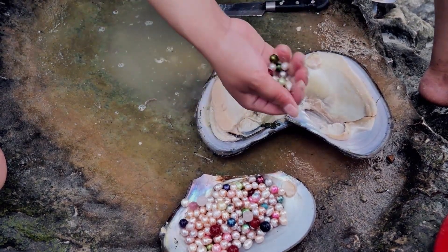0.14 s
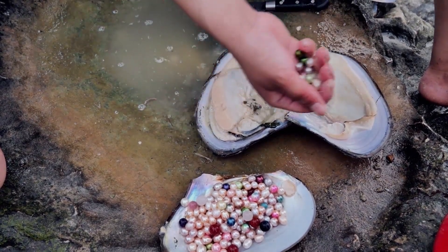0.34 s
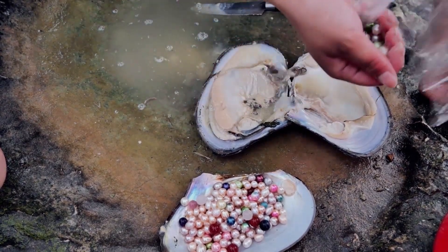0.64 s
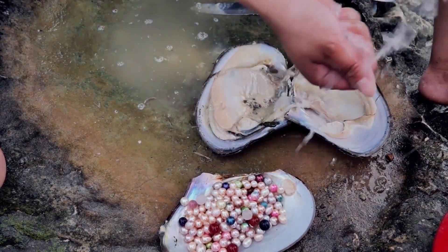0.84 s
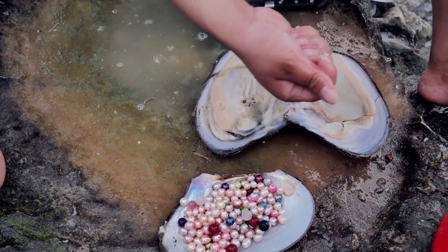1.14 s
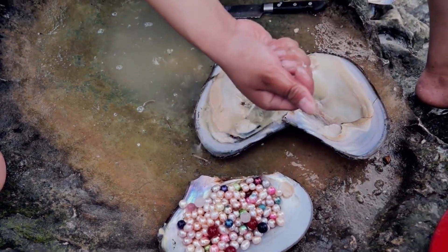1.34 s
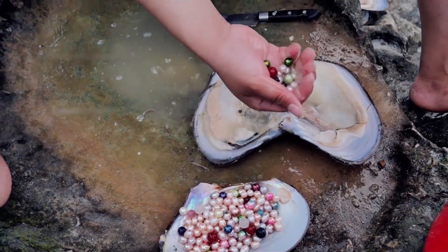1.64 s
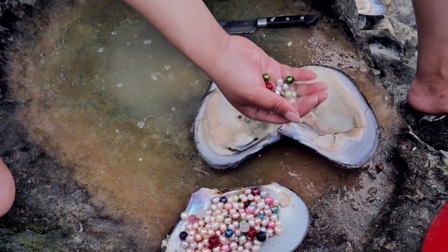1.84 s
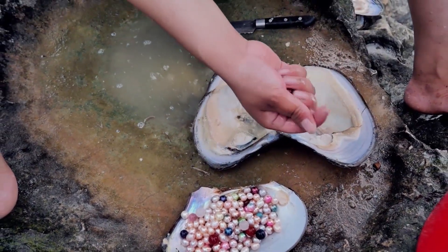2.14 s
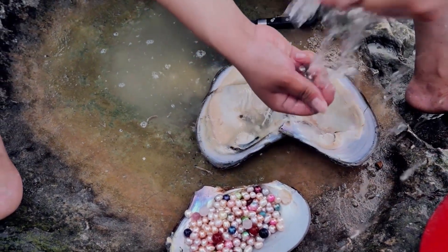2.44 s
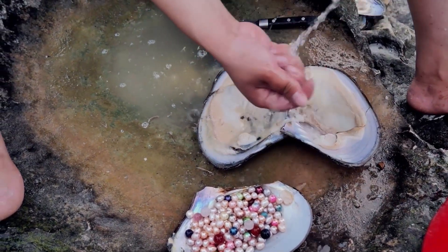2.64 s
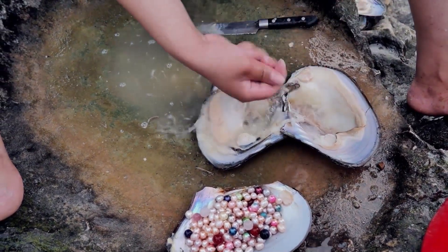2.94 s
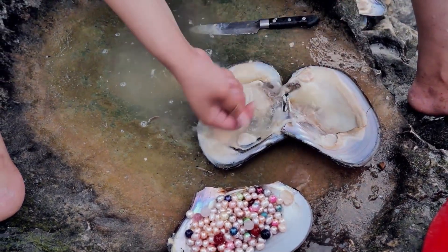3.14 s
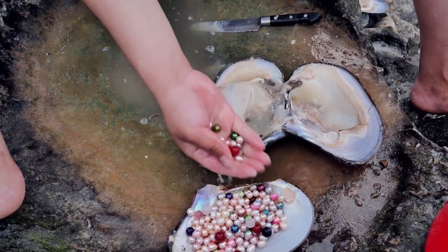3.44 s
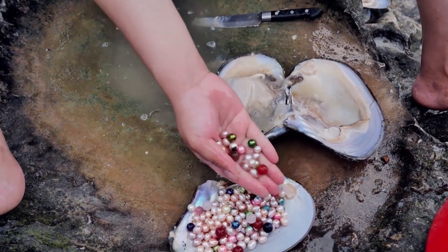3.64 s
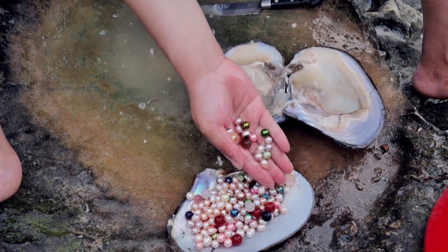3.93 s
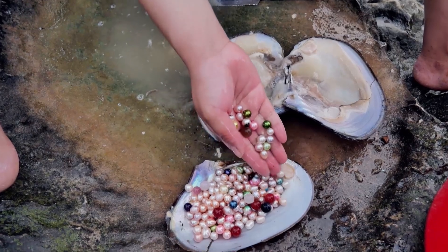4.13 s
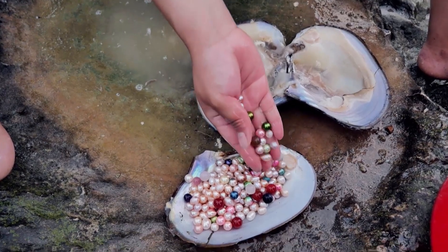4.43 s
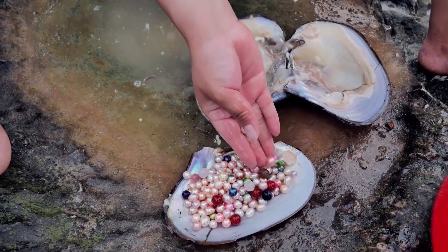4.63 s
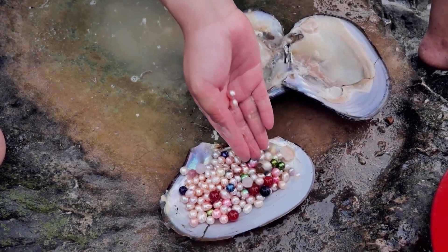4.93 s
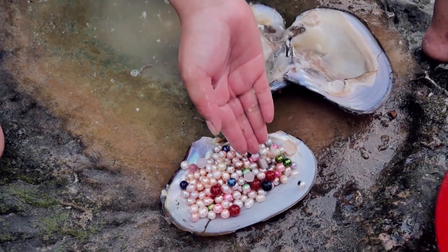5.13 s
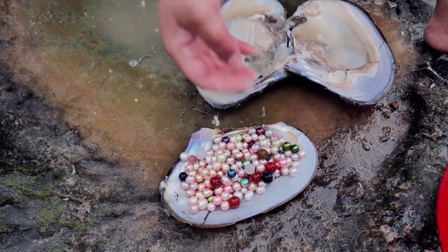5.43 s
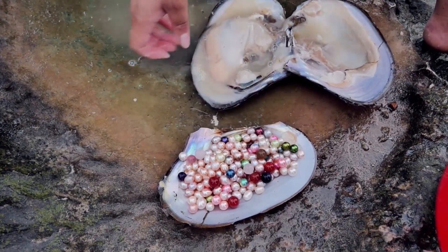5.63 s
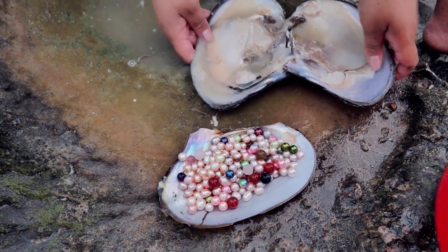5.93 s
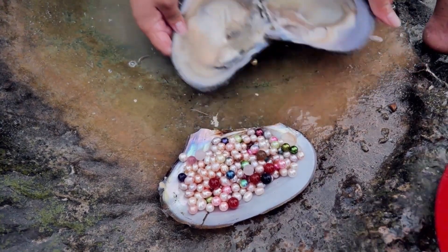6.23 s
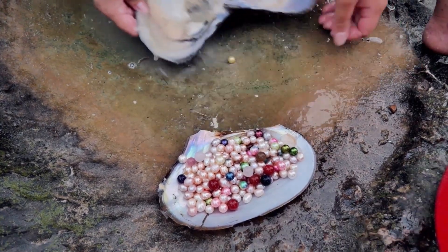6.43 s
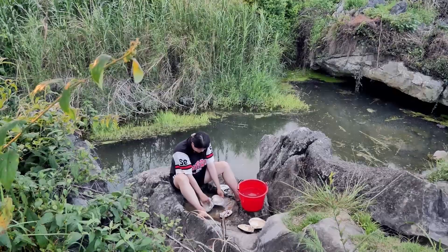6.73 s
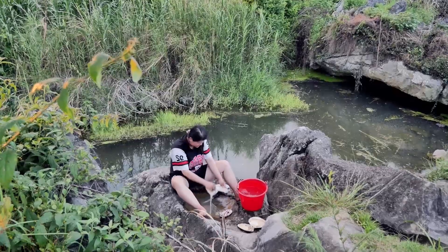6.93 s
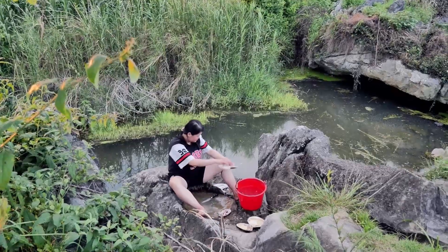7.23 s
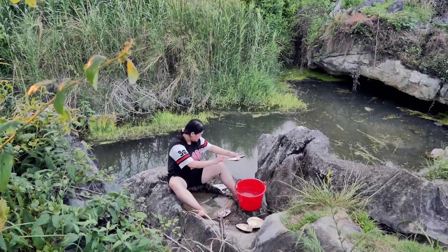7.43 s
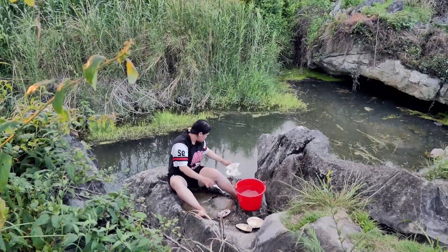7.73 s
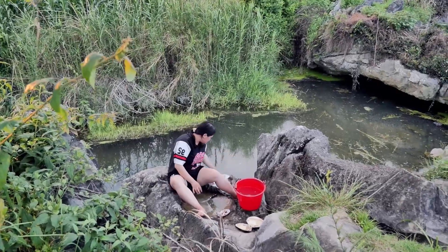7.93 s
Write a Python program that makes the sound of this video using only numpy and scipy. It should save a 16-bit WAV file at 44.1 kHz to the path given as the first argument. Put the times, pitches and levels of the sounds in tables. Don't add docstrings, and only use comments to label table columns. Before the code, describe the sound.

Close outdoors at a rock pool, a hand rinses beads in quick bursts of bubbling splashes, drips and fine spray, busiest in the first second and again after two. The water stops, a bird whistles faintly, and beads drop then pour with hard glassy ticks onto a heap in a shell. A big shell rubs and knocks on rock. After a short silence, a wider quiet ambience has low hum, a pulsing insect and tiny wet ticks.

```python
import sys
import numpy as np
from scipy import signal
from scipy.fft import rfft, irfft
from scipy.io import wavfile
from scipy.ndimage import uniform_filter1d

SR = 44100
rng = np.random.default_rng(int(sys.argv[2]) if len(sys.argv) > 2 else 0)


def boost(x):
    u = np.asarray(x, float) / 20
    return 10 ** u


def master(y):
    cut = np.clip(np.atleast_2d(y).T, -1, 1)
    pcm = np.round(cut * 32767)
    wavfile.write(sys.argv[1], SR, pcm.astype(np.int16))


N = 355887


def evened(x):
    return x / np.sqrt(np.mean(x ** 2) + 1e-20)


def read(points, hz):
    f, value = np.transpose(points)
    return np.interp(np.log(hz + 1), np.log(f + 1), value)


def curve(rows, col):
    rows = np.asarray(rows)
    return boost(np.interp(np.arange(N) / SR, rows[:, 0], rows[:, col]))


def add(mix, s, sound, pan_db=0.):
    part = mix[:, round(s * SR):][:, :len(sound)]
    share = 1 / (1 + boost(-2 * pan_db))
    part += np.sqrt([[2 * share], [2 - 2 * share]]) * sound[:part.shape[1]]


def band(x, lo_hz, hi_hz):
    sos = signal.butter(2, [lo_hz, min(hi_hz, SR / 2 - 100)], "bandpass", fs=SR, output="sos")
    return signal.sosfilt(sos, x)


def noise(shape, n, patchy_db, alike):
    frames, hz = n // 256 + 5, np.fft.rfftfreq(1024, 1 / SR)
    a, b, c, d, patches = rng.standard_normal((frames, 513, 5)).T
    patches = evened(uniform_filter1d(uniform_filter1d(patches, 8, 0), 8, 1))
    same = np.clip(alike(hz), -1, 1)[:, None]
    left = a + 1j * b
    right = same * left + np.sqrt(1 - same ** 2) * (c + 1j * d)
    gain = boost(read(shape, hz)[:, None] + patchy_db * patches)
    return signal.istft(np.array([left, right]) * gain, nperseg=1024, noverlap=768)[1][:, :n]


def half_shared_noise():
    white = rng.standard_normal((3, N))
    return white[:2] + 0.97 * white[2]


def ring(t, modes, spread):
    tune = rng.uniform(1 - spread, 1 + spread, len(modes))
    return sum(boost(db - 60 * t / t60) * np.sin(2 * np.pi * hz * u * t) for (hz, db, t60), u in zip(modes, tune))


def wet_bursts(rows, t60, pan_db, wide_db):
    out, t = np.zeros((2, N)), np.arange(1500) / SR
    attack = 1 - np.exp(-(t / 0.00086) ** 2)
    decay = boost(-60 * t / t60) + 0.8 * boost(-60 * t / 0.005)
    for s, db, hz in rows:
        a, b = rng.standard_normal((2, len(t)))
        burst = evened(band(band(a, hz * 0.7, hz * 1.23), hz * 0.46, hz * 2.9))
        burst += boost(wide_db) * evened(band(b, 1300, 6140))
        burst += 0.87 * np.sin(2 * np.pi * hz * t * (1 + 6.0 * t)) * np.tanh(t / .002)
        burst *= attack * decay
        add(out, s - .0006, boost(db) * burst / abs(burst).max(), pan_db)
    return out


SILENCE = (6.52, 6.798)
# [f/Hz, density level/dB per Hz]
HUM_NEAR = [(30, -51), (86, -17), (190, -17.5), (273, -3), (430, -6), (565, -4), (700, -14), (1360, -23.5),
            (2300, -27), (7600, -44), (9500, -40.5), (11500, -46.5), (13000, -64)]
HUM_WIDE = [(30, -52), (140, -11), (210, -18), (271, -0.5), (520, -4), (724, -12), (2060, -25),
            (7600, -43.5), (8000, -45), (10000, -44.5), (13000, -66)]
# [f/Hz, likeness 0..1]
COHERENCE = [(60, 0.18), (170, 0.8), (490, 0.13), (11600, .85)]
# [f/Hz, width/Hz, level/dB against the hum]
HUM_MODES = [
    (284, 61, -5.5),
    (567.7, 47, -6),
]
# [t/s, level/dB]
HUM = [
    (0, -42),
    (4.5, -44),
    (5.1, -48),
    (5.7, -45),
    (6.8, -43.5),
    (8.07, -42),
]


def valley_hum():
    cut = int(np.mean(SILENCE) * SR)
    views = []
    for shape, n in ((HUM_NEAR, cut), (HUM_WIDE, N - cut)):
        view = noise(shape, n, patchy_db=2.5, alike=lambda hz: read(COHERENCE, hz))
        views.append(view / np.std(band(view, 232, 442)))
    hum = np.hstack(views)
    white = half_shared_noise()
    for hz, width, db in HUM_MODES:
        lean = boost([[-hz / 350], [hz / 350]])
        hum += boost(db) * evened(band(white, hz - width / 2, hz + width / 2)) * lean
    return curve(HUM, 1) * hum


# [t/s, level/dB]
CHORUS = [
    (0, -48),
    (1.4, -47.5),
    (1.55, -83),
    (2.3, -50.5),
    (4.5, -51),
    (5.4, -57.5),
    (6.5, -52),
    (6.8, -59.5),
]


def insect_choruses():
    t, white = np.arange(N) / SR, half_shared_noise()
    low = evened(band(white, 1970, 2085)) * (1 + 0.25 * np.sin(2 * np.pi * 110 * t))
    high = evened(band(band(white + 2.1 * white[0], 6600, 7360), 6500, 7600))
    thin = boost(-70.0) * evened(band(white, 8800, 9360)) * (t > SILENCE[1]) * (t < 7.65)
    high_level = curve(HUM, 1) * boost(-22)
    return curve(CHORUS, 1) * low * boost([[-2.5], [2.5]]) + high_level * high + thin


def near_insect():
    first_s, gap_s = 6.829, .0925
    out, t = np.zeros((2, N)), np.arange(int(.07 * SR)) / SR
    for s in np.arange(first_s, N / SR, gap_s):
        clicks = rng.standard_normal(len(t)) * (2.1 + np.cos(np.pi * 150 * t) ** 4)
        throb = evened(band(band(clicks, 6000, 6800), 6030, 6900)) * np.hanning(len(t))
        add(out, s - t[-1] / 2, boost(-53.5) * throb)
    return out


# [t/s, length/s, start f/Hz, end f/Hz, level/dB]
BIRD = [(3.757, 0.019, 3180, 2480, -32.5), (3.78, 0.0097, 2400, 2100, -38), (4.029, 0.025, 3170, 2930, -35),
        (4.061, 0.058, 2640, 2280, -38), (4.114, 0.045, 2174, 2080, -38), (4.38, 0.026, 2960, 2800, -38),
        (4.401, 0.028, 2480, 2290, -39), (4.459, 0.023, 2760, 2710, -45), (4.515, 0.033, 2190, 1896, -38.5),
        (3.663, 0.034, 2094, 2100, -47), (7.504, 0.029, 2550, 2220, -55), (7.82, 0.023, 2698, 2490, -58),
        (7.968, 0.028, 3060, 2850, -54), (8.015, 0.025, 2772, 2490, -50.5)]


def bird():
    out = np.zeros(N)
    for s, length, from_hz, to_hz, db in BIRD:
        u = np.linspace(0, 1, int(length * SR))
        quaver = evened(uniform_filter1d(rng.standard_normal((2, 4000)), 150, axis=1))[:, :len(u)]
        turns = np.cumsum((from_hz + (to_hz - from_hz) * u) * (1 + .012 * quaver[0])) / SR
        level = boost(db + 2.6 * quaver[1]) * np.sin(np.pi * u) ** 2
        out[int(s * SR):][:len(u)] += level * np.sin(2 * np.pi * turns)
    t = np.arange(9000) / SR
    leaves = rng.standard_normal((2, len(t))) * (boost(-60 * t / 0.078) + boost(-13 - 60 * t / .4))
    scattered = signal.oaconvolve(out[None], leaves / np.linalg.norm(leaves[0]), axes=1)[:, :N]
    return 1.32 * out + 1.5 * scattered


# [t/s, peak level/dB, f/Hz centre]
TICKS = [(5.8147, -33, 1340), (6.0127, -29, 1560), (6.1358, -27, 1890), (6.2208, -34.5, 1340),
         (6.477, -39.5, 3200), (6.497, -42.5, 3000), (5.816, -37, 3000), (6.511, -36.5, 1490),
         (7.259, -34.5, 3000), (7.3487, -35.5, 3512), (7.408, -38.5, 3330)]
# [t/s, peak level/dB, treble level/dB]
KNOCKS = [
    (6.2563, -3, 1),
    (6.4352, -10.5, -26),
]
# [f/Hz, level/dB, t60/s]
ROCK = [(314, 0.5, 0.032), (790, -7, 0.01), (1007, -2.5, 0.016), (1340, -1, 0.015), (1860, 1, 0.014),
        (3160, -6, 0.015), (3580, -11, 0.017), (4280, -10.5, 0.011)]
# [t/s, level/dB]
SCRAPE = [
    (5.6, -61),
    (5.72, -60),
    (5.84, -65),
    (6.29, -60.5),
    (6.36, -51),
    (6.38, -77),
]


def handling():
    out, t = wet_bursts(TICKS, t60=0.021, pan_db=-1.5, wide_db=-10.5), np.arange(3000) / SR
    for s, db, treble_db in KNOCKS:
        modes = [(hz, level + treble_db * max(np.log2(hz / 1340), 0), t60) for hz, level, t60 in ROCK]
        noisy = rng.standard_normal(len(t)) * boost(-60 * t / 0.014)
        crack = band(band(noisy, 1160, 1540) + boost(treble_db) * band(noisy, 1150, 3800), 600, 5600)
        hit = band(ring(t, modes, spread=0.0066), 200, 7200)
        blow = hit / abs(hit).max() + 0.21 * crack / abs(crack).max()
        blow *= 1 - np.exp(-t / 0.00029)
        add(out, s, boost(db) * band(blow, 290, 9300), -1.5)
    grit = rng.standard_normal(N) * boost(2.6 * rng.exponential(1, N))
    rubbing = np.arange(N) / SR > SCRAPE[0][0]
    return out + rubbing * curve(SCRAPE, 1) * evened(band(grit, 2700, 4580))


# [f/Hz, density level/dB per Hz]
FOAM = [(600, -6.5), (1600, -8), (3300, -3.5), (4500, -9.5), (9000, -16), (12000, -20.5)]
# [start t/s, hold/s, level/dB, treble level/dB against the level]
STROKES = [(0, 0.011, -43, -21), (0.14, 0.0032, -33, -16.5), (0.332, 0.11, -35, -17.5),
           (0.479, 0.031, -26.5, -17.5), (0.596, 0.049, -29.5, -17.5), (0.786, 0.073, -30.5, -9),
           (1.033, 0.12, -46.5, -8.5), (1.232, 0.21, -49, -18), (1.604, 0.0092, -39.5, -10),
           (1.939, 0.0059, -33.5, -15.5), (2.12, 0.16, -32.5, -15.5), (2.332, 0.095, -42.5, -13),
           (2.572, 0.068, -35.5, -5), (2.84, 0.097, -52, -2.5), (2.987, 0.079, -50.5, -11),
           (3.313, 0.13, -50, -10.5), (3.545, 0.0087, -44, -7)]


def churn():
    wet_until_s, rise_db_per_s, fall_db_per_s = 3.7, 354, 306
    n, sizes = int(wet_until_s * SR), 36
    happens = rng.random(n) < 5500 / SR
    size = boost(2.8 * np.minimum(rng.exponential(1, n), 3)) * happens
    kind, out = rng.integers(0, sizes, n), np.zeros((2, n))
    shared, at = rng.standard_normal(n // 256 + 2), np.arange(n) / 256
    for k, hz in enumerate(np.geomspace(800, 11000, sizes)):
        t = np.arange(int(30 * SR / hz)) / SR
        decay_cycles = np.interp(hz, (2000, 7000), (5.5, 2.6))
        grain = (1 - np.exp(-t * hz)) * np.exp(-t * hz / decay_cycles)
        grain *= np.sin(2 * np.pi * hz * t * (1 + 0.0024 * hz * t))
        own_db = np.interp(hz, (2500, 7000), (5.0, 3.5))
        clump_db = 5.0 * shared + own_db * rng.standard_normal(len(shared))
        clumps = boost(np.interp(at, np.arange(len(shared)), clump_db))
        one = boost(read(FOAM, hz)) * hz * signal.oaconvolve(clumps * size * (kind == k), grain)[:n]
        add(out, 0, one, rng.uniform(-12.0, 19) * (hz < 4000))
    low, high = evened(band(out, 700, 4570)), evened(band(out, 4070, 9600))
    t, effort = np.arange(n) / SR, np.zeros((2, n))
    for s, hold, db, treble_db in STROKES:
        away_db = np.maximum(rise_db_per_s * (s - t), fall_db_per_s * (t - s - hold))
        effort += boost(db - np.clip(away_db, 0, 99)) * boost(np.array([[1.0], [8.0 + treble_db]]))
    return np.pad(effort[0] * low + effort[1] * high, ((0, 0), (0, N - n)))


# [t/s, peak level/dB, f/Hz centre] drops slapping water, skin and shell, singly or in quick strings
SLAPS = [(0.0042, -20.5, 2365), (0.1759, -13, 3500), (0.4081, -21, 2760), (0.4459, -16, 3030),
         (0.6112, -29, 3780), (0.6464, -23, 2570), (0.287, -34.5, 5660), (0.8703, -18, 2980),
         (1.2947, -19.5, 3800), (1.5721, -13.5, 3960), (1.6542, -22, 3500), (1.6662, -25, 2820),
         (1.9401, -19, 3660), (2.0747, -16.5, 2920), (2.1728, -19.5, 3120), (2.5154, -26, 4520),
         (2.321, -26, 3670), (2.4341, -17.5, 3590), (2.4554, -25, 4450), (2.4844, -15, 3500),
         (2.5296, -20, 6580), (2.5796, -11.5, 2890), (2.777, -23, 2940), (3.0382, -23, 6140),
         (3.2297, -15, 3400), (3.364, -18, 3940), (3.408, -22.5, 5960), (3.3526, -24, 3500),
         (3.3928, -22.5, 4400),
         (0.4724, -21, 3390), (.488, -17, 3020), (0.5048, -20, 3170), (0.521, -21.5, 5610),
           (0.559, -21, 3500), (0.575, -23, 2400), (0.7752, -12, 2630), (0.787, -15, 2960),
           (.7981, -22, 3270), (.804, -24, 2800), (.812, -15, 3000), (0.825, -16, 3500), (.836, -20, 2660),
           (0.85, -20, 2950), (.889, -20, 2940), (.9078, -25.5, 2980), (0.931, -25, 4020),
           (2.5644, -27, 3160), (2.5733, -21.5, 2830), (2.605, -18, 3180), (2.617, -15.5, 3300),
           (2.632, -23, 3430), (2.6588, -18.5, 4000), (2.674, -16.5, 2630), (2.693, -25, 4230),
           (3.4704, -28.5, 3670), (3.483, -31, 4430), (3.494, -40, 4000), (3.5361, -16, 4960),
           (3.542, -19, 3500), (3.547, -31, 4600), (3.565, -41, 5070), (3.582, -35, 3980)]
MIST = [(.0358, -28.5, 5650), (.054, -34, 3500), (.0867, -41, 3430), (.0997, -31, 4040), (.1126, -19, 2340),
        (.1476, -16, 2440), (.154, -23, 3500), (.202, -48, 2980), (.224, -49, 8000), (.3995, -29, 2680),
        (.61, -14, 3010), (.6634, -23, 2730), (.686, -34, 6400), (.718, -40.5, 5140), (1.1635, -33, 6400),
        (1.1849, -32, 3870), (1.2513, -27, 3500), (1.312, -28.5, 4730), (1.33, -32, 2800),
        (1.4069, -31.5, 3640), (1.4254, -36, 3200), (1.4653, -30, 8000), (1.5546, -37, 3350),
        (1.586, -28, 9200), (1.7147, -35.5, 5830), (1.879, -34, 4630), (1.9148, -21.5, 3480),
        (1.951, -20, 2420), (1.968, -28, 2950), (2.011, -33, 3820), (2.068, -28, 3060), (2.2226, -31, 4460),
        (2.25, -20, 3020), (2.268, -24, 3050), (2.728, -38, 4840), (2.7638, -30, 2800), (2.792, -33, 3000),
        (2.9913, -36.5, 4160), (3.0073, -31, 4530), (3.0631, -27, 4970), (3.106, -34, 3000),
        (3.2048, -36, 2950), (3.253, -38, 3960), (3.2787, -32, 4260), (3.334, -32, 3500),
        (3.415, -24, 3830), (3.62, -39, 7400), (3.7142, -40, 3930), (7.273, -35.5, 3500),
        (7.368, -42, 3500)]
DRIPS = [(.7415, -22.5, 1780), (.926, -21, 4730), (1.05, -32, 5060), (1.136, -23, 6940), (1.192, -36, 1540),
         (1.262, -17.5, 1497), (1.4885, -37, 2700), (1.8267, -29.5, 7400), (1.8848, -36, 2350),
         (2.3655, -21.5, 2480), (2.395, -18.5, 1730), (2.8764, -22, 5300), (3.329, -29, 3670),
         (3.799, -33.5, 4950)]


def splashes():
    out = wet_bursts(SLAPS, t60=0.024, pan_db=0.0, wide_db=-6.0)
    out += wet_bursts(MIST, t60=0.023, pan_db=1.6, wide_db=-15.5)
    return out + wet_bursts(DRIPS, t60=0.033, pan_db=1.5, wide_db=-10.5)


# [t/s, peak level/dB, f/Hz, glide factor, t60/s]
BUBBLES = [(0.112, -19.5, 646, 1, .12), (0.247, -24.5, 657, 1.06, 0.1), (0.356, -22, 830, 0.73, .081),
           (0.361, -22, 1870, 0.97, 0.041), (0.471, -21, 645, 1.14, 0.067), (0.525, -21, 955, 1.13, 0.04),
           (0.557, -20.5, 1180, 1.16, 0.063), (0.384, -26.5, 653, 1.04, 0.095),
           (0.616, -21.5, 658, 0.98, 0.088), (0.647, -21.5, 1475, 0.91, 0.028),
           (0.695, -24.5, 1068, 1.12, 0.027), (0.775, -21.5, 1353, 1.05, 0.03),
           (1.408, -21, 1193, 1.22, 0.087), (1.927, -28, 1625, 0.97, 0.04),
           (2.086, -21.5, 1690, 1.04, 0.065), (2.117, -20.5, 1020, 1.03, 0.019),
           (2.122, -14, 524, 1.2, 0.055), (2.131, -15, 1750, 1.12, 0.022), (2.138, -19, 800, 1.04, 0.046),
           (2.174, -24, 1050, 0.94, 0.019), (2.194, -24, 1143, 0.97, 0.052),
           (2.245, -26, 1023, 1.05, 0.055)]
# [t/s, peak level/dB, f/Hz]
POPS = [(0.135, -11.5, 1196), (0.144, -19, 570), (0.1473, -15, 1610), (0.149, -11, 2330), (0.164, -18, 825),
        (0.167, -17.5, 1510), (0.322, -17, 1277), (0.339, -15, 2420), (0.369, -21.5, 790),
        (0.424, -14, 2290), (0.474, -15.5, 3240), (0.504, -19.5, 3213), (0.61, -16, 2320),
        (0.667, -21, 1780), (0.799, -19, 2640), (0.826, -25, 840), (0.871, -16.5, 2970),
        (1.263, -22.5, 880), (1.668, -15.5, 2020), (1.951, -22.5, 1520), (2.68, -18, 1677),
        (3.232, -23, 1580),
        (0.255, -27, 1040), (.262, -31, 1230), (0.285, -29.5, 2600), (1.263, -27.5, 2380),
          (.333, -23, 2340), (.343, -22, 626), (.378, -26, 1110), (0.4, -21.5, 2570), (.403, -34, 1850),
          (.423, -28, 1700), (0.446, -23, 2940), (.504, -23, 1790), (.511, -25, 1030), (.16, -21.5, 3530),
          (.577, -26, 2380), (0.585, -26, 1300), (.113, -26, 2450), (.601, -32, 3200), (0.61, -22.5, 1270),
          (.631, -26, 2300), (.648, -22, 1790), (0.664, -28, 2670), (1.919, -17, 1720), (1.194, -32, 1530),
          (.785, -27, 3570), (0.79, -27, 2670), (.802, -18.5, 3400), (.803, -20.5, 1890), (.825, -27, 2270),
          (0.836, -24, 2450), (0.868, -25, 3580), (0.87, -25, 2410), (0.89, -27.5, 2090), (.907, -29, 3050),
          (1.609, -33, 3500), (1.609, -35, 1310), (1.645, -32, 2500), (1.667, -23, 2950),
          (1.328, -35, 1290), (2.05, -36, 2910), (2.075, -24.5, 2200), (2.134, -20, 1225),
          (2.141, -21, 1210), (2.15, -20.5, 1140), (2.172, -19, 3340), (1.886, -28.5, 2410),
          (2.226, -31, 850), (2.266, -30, 1200), (2.299, -28.5, 1830), (2.321, -30, 3580),
          (2.308, -36, 505), (1.428, -31.5, 2700), (2.352, -31, 3300), (2.372, -28, 2570),
          (1.49, -33.5, 2510), (2.399, -27, 1640)]
# [t/s, left-right level/dB]
LEFTWARD = [
    (0.7, 9.5),
    (0.77, 0),
    (1.3, 9),
    (2.3, 10.5),
    (2.6, -4),
]


def bubbles():
    out = np.zeros((2, N))
    small = [(s, db, hz, 1.01, .015) for s, db, hz in POPS]
    for s, db, hz, glide, t60 in BUBBLES + small:
        t = np.arange(0, abs(t60) + .012, 1 / SR)
        wobble = evened(uniform_filter1d(rng.standard_normal(4000), 120))[np.arange(len(t)) % 4000]
        pitch = hz * glide ** np.minimum(t / (t60 / 5 + 0.0022), 2.2) * (1 + 0.036 * wobble)
        swell = 1 - np.exp(-(t * hz / 1.06) ** 2)
        shape = swell * boost(-60 * (t / (0.87 * t60 + 0.0089)) ** 1.43 + 1.1 * wobble[::-1])
        sided = np.exp(-(np.log2(hz / 1750) / 1.1) ** 2)
        pan_db = np.interp(s, *np.transpose(LEFTWARD)) * sided
        tone = np.sin(2 * np.pi * np.cumsum(pitch) / SR)
        add(out, s - .0015, boost(db + 2.5) * shape / shape.max() * tone, pan_db)
    return out


# [t/s, peak level/dB] the handful sliding off the palm
POUR = [(4.6003, -10.5), (4.611, -10.5), (4.6222, -9), (4.629, -8.5), (4.6747, -9.5), (4.683, -8.5),
        (4.6939, -9), (4.721, -17), (4.727, -8), (4.739, -12), (4.749, -13.5), (4.777, -18),
        (4.8093, -22.5), (4.8942, -18), (4.9289, -21.5), (4.9613, -15.5), (4.984, -23.5), (5.0163, -10),
        (5.0379, -17), (5.0598, -8.5), (5.1328, -20.5), (5.1617, -23), (5.2346, -9.5), (5.2426, -6.5),
        (5.271, -15), (5.2931, -18), (5.3083, -13.5), (5.3308, -11.5), (5.349, -22), (5.3731, -13)]
# [t/s, peak level/dB]
BEADS = [(3.9152, -5.5), (3.931, -24), (3.9665, -22), (3.993, -30), (4.0258, -19), (4.053, -9),
         (4.1953, -30), (4.2402, -27), (4.3039, -23), (4.3803, -28), (4.4552, -22), (4.473, -25.5),
         (4.6687, -19), (4.833, -35), (5.084, -23), (5.442, -34.5),
         (4.017, -29), (4.486, -33), (4.53, -32), (3.938, -27), (3.944, -29), (4.568, -32.5),
              (4.592, -36), (4.644, -17), (4.712, -25), (4.77, -25), (4.786, -25), (4.827, -25),
              (4.837, -31.5), (4.023, -23), (4.888, -27), (4.9, -27), (4.918, -27), (4.951, -41),
              (4.973, -33), (5.025, -19), (5.045, -21), (5.1122, -36), (5.121, -28), (5.151, -41),
              (5.256, -26), (5.281, -25), (5.3, -20), (5.316, -24), (5.355, -31), (5.364, -20), (5.48, -42),
              (5.521, -43.5)]


def landings():
    rows = [(s, db, -4) for s, db in POUR] + [(s, db, -5) for s, db in BEADS]
    chance = 2 * rng.random(len(rows)) - 1
    return [(s, db, treble_db + 1.5 * c) for (s, db, treble_db), c in zip(rows, chance)]


# [f/Hz, density level/dB per Hz]
BEAD_BODY = [(700, -44.5), (1400, -18), (2100, 0), (2900, -1), (3400, -6.5), (5400, -8.5), (9200, -15),
             (12000, -16.5), (16000, -71)]
# [f/Hz, level/dB, t60/s]
SHELL = [(2240, 8.5, 0.0124), (2850, 9, 0.013), (3500, -17.5, 0.031), (4160, 3, 0.026), (5350, -21.5, .03)]


def beads():
    out, t = np.zeros((2, N)), np.arange(2048) / SR
    lead = np.zeros(40)
    colour = boost(read(BEAD_BODY, np.fft.rfftfreq(4096, 1 / SR)))
    for s, db, treble_db in landings():
        grit = rng.standard_normal(len(t))
        rattle = grit * boost(-60 * t / 0.0055) + 0.54 * band(grit, 820, 11200) * boost(-60 * t / 0.035)
        rattle = irfft(rfft(np.r_[lead, rattle], 4096) * colour)[:len(t)]
        rattle = rattle + (boost(treble_db + 7.5) - 1) * band(rattle, 6030, 9900)
        shell = np.r_[lead, ring(t, SHELL, spread=.06)][:len(t)]
        hit = evened(rattle) + 0.4 * evened(shell)
        hit[40] += 0.45 * abs(hit).max()
        add(out, s - 40 / SR, boost(db) * band(hit, 1040, 16000) / abs(hit).max(), -.4)
    return out


def scene():
    near = bubbles() + splashes() + churn() + beads() + handling()
    t = np.arange(1500) / SR
    rocks = rng.standard_normal((2, len(t))) * boost(-60 * t / 0.037) * (t > .002)
    echo = boost(-8.5) * signal.oaconvolve(near, rocks / np.linalg.norm(rocks[0]), axes=1)[:, :N]
    power_db = 10 * np.log10(abs(uniform_filter1d((near ** 2).mean(0), 300)) + 1e-12)
    fall = np.arange(N) * 21.0 / SR
    over_db = np.maximum(np.maximum.accumulate(power_db + fall) - fall + 27.0, 0)
    far = echo + valley_hum() + insect_choruses() + bird() + near_insect()
    return near + far / boost(.35 * uniform_filter1d(over_db, 200))


def top_cut(x):
    return signal.sosfilt(signal.butter(12, 15800, fs=SR, output="sos"), x)


def record(dry):
    t = np.arange(N) / SR
    gate = np.clip(np.maximum(SILENCE[0] - t, t - SILENCE[1]) / 0.0048, 0, 1)
    edged = band(dry * gate, 50, 10000)
    edged = signal.sosfilt(signal.butter(2, 11500, fs=SR, output="sos"), edged)
    hz, _, z = signal.stft(edged, SR, nperseg=1024)
    hz = hz[:, None]
    patch = uniform_filter1d(uniform_filter1d((abs(z) ** 2).mean(0), size=5, axis=0), size=2, axis=1)
    grain = rng.standard_normal(z.shape) + 1j * rng.standard_normal(z.shape)
    z = z + boost(-16.5) * np.sqrt(abs(patch)) * grain * (hz > 3000)
    faint = (patch < boost(-98) ** 2) & (hz > 7600)
    mix = signal.istft(z * ~faint, nperseg=1024)[1][:, :N]
    return top_cut(mix)


dry = scene()
out = record(dry)
master(out)
```